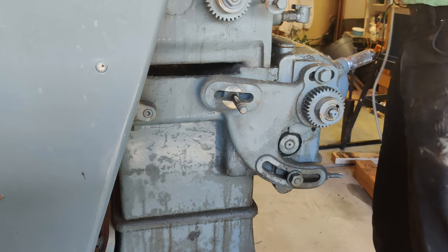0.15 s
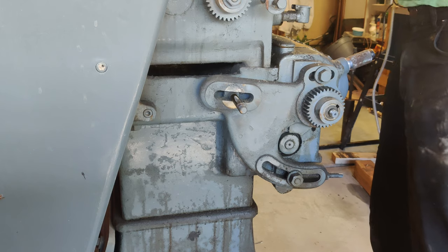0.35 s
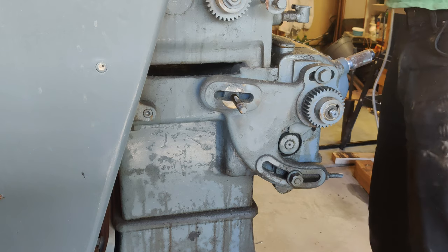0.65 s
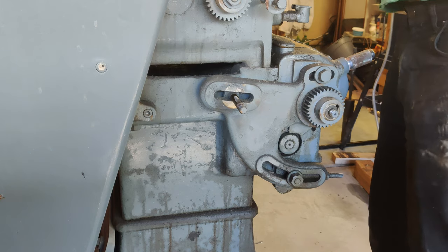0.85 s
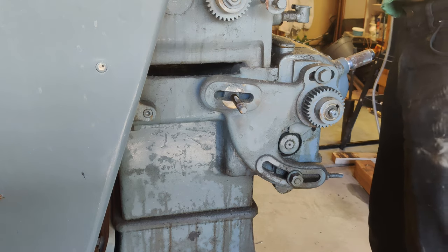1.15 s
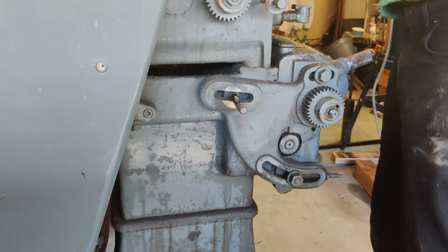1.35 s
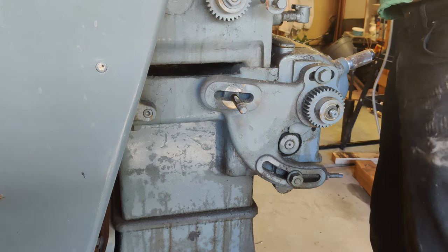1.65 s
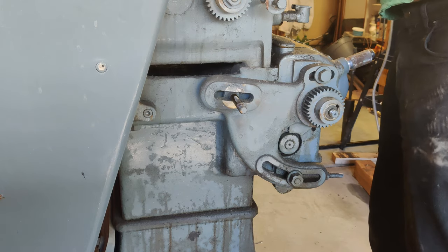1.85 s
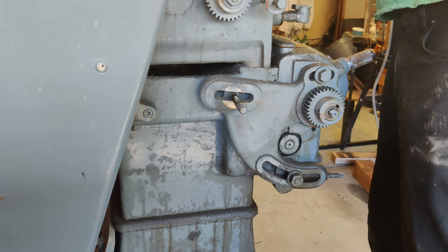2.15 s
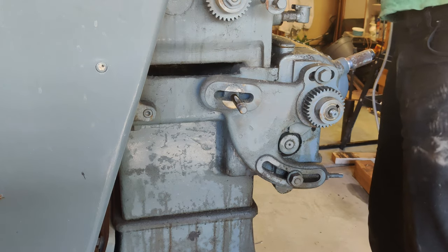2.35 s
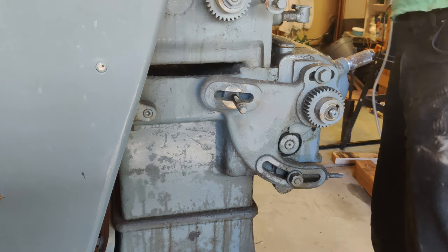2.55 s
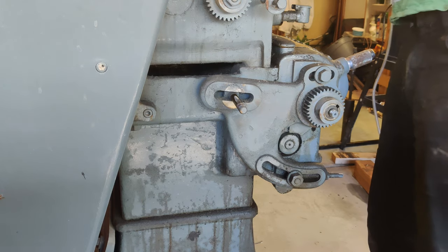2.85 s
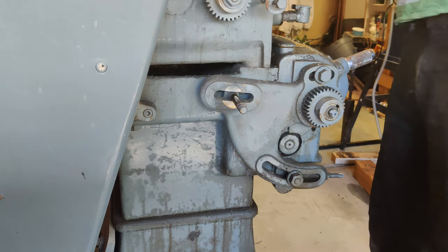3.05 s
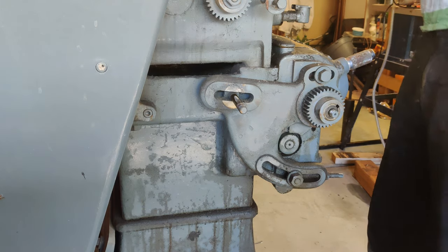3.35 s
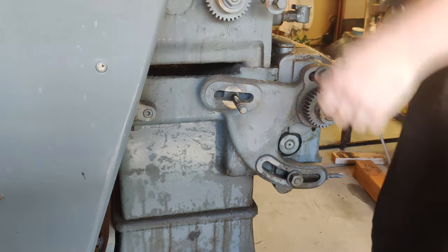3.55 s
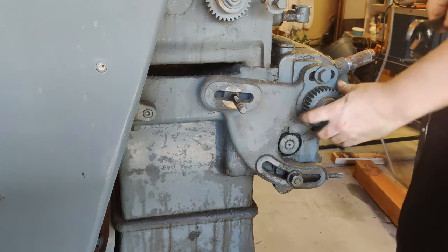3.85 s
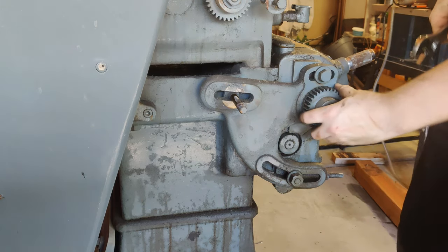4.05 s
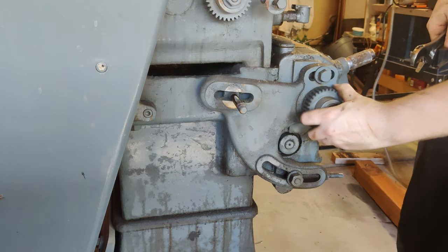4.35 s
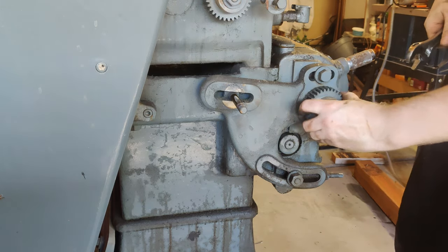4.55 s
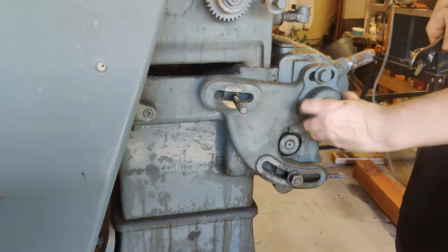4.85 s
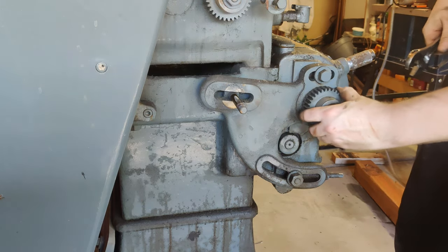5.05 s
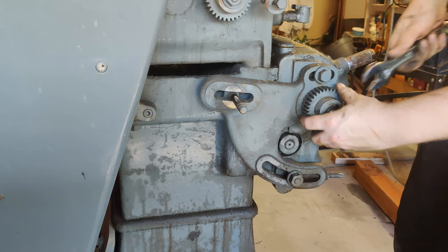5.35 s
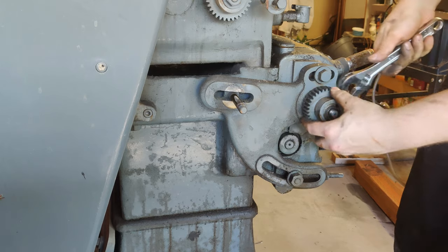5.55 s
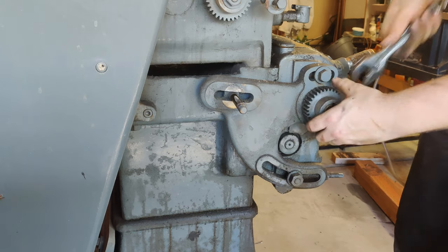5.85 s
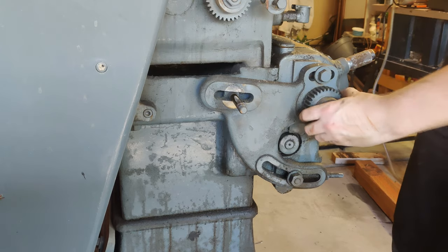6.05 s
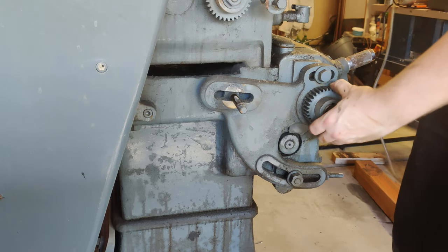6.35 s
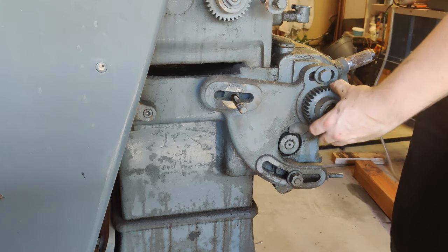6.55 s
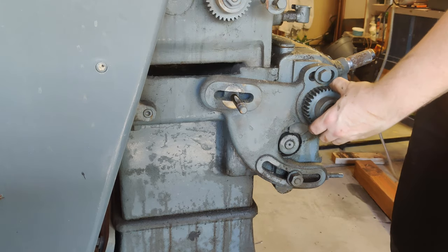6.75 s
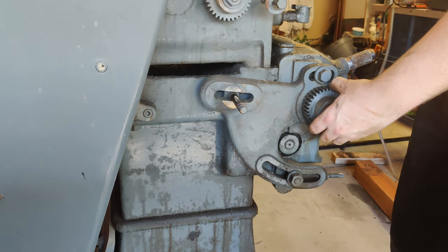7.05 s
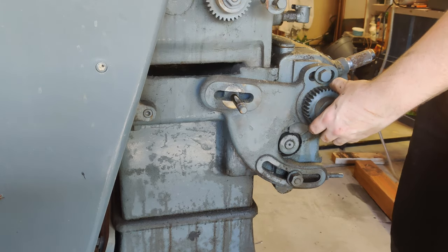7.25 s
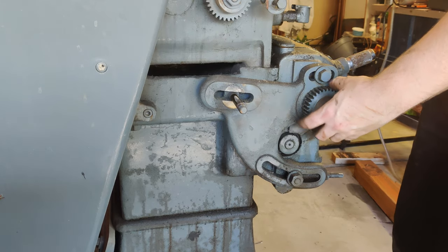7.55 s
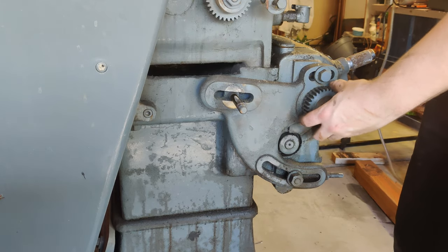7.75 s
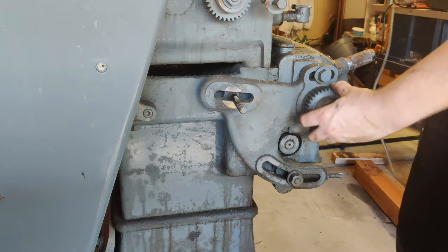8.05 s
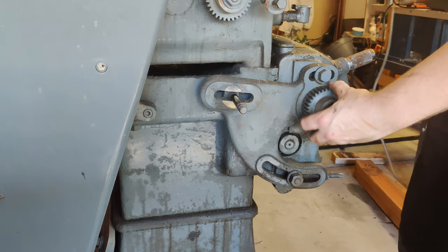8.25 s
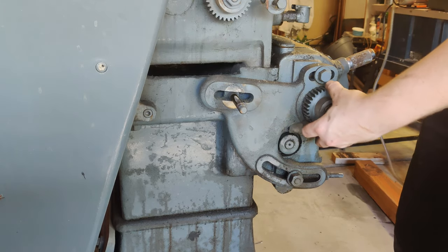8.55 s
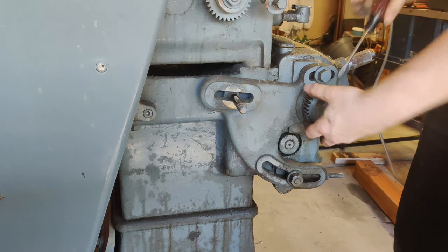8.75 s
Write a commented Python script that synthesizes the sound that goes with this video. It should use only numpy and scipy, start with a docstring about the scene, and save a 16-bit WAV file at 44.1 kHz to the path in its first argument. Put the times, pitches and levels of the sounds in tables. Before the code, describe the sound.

Over a faint low hum, metal tools tick, a gear bumps dully in the hand, a steel wrench clanks sharply and a heavy bracket clatters.

```python
"""A low machine hum and still air in a workshop come first; tools click and tap, a dull tick, a sleeve swishes.
A hand works a gear on its shaft with dull bumps; a steel wrench touches the stud, then lands with a bright clank.
The cast-iron gear bracket shifts and clatters; at the end the wrench lifts off with a bright clack. Hum is wavering
sines, air and cloth are shaped noise; each blow is a gritty contact, a crowd of short modes and a few that ring on.
A close microphone pair hears it all with the room's echoes; the recorder's gain ducks under the loudest blows."""
import sys
import numpy as np
from scipy import signal
from scipy.fft import rfft, irfft
from scipy.io import wavfile
from scipy.ndimage import uniform_filter1d, minimum_filter1d

SR = 44100
rng = np.random.default_rng(int(sys.argv[2]) if len(sys.argv) > 2 else 0)


def put_to_file(sound):
    """Save the sound as 16-bit audio at rate SR, in the file named by the first command-line argument."""
    columns = np.atleast_2d(sound).T  # one column per channel
    safe = np.clip(columns, -1, 1)
    whole_steps = np.round(safe * 32767)
    wavfile.write(sys.argv[1], SR, whole_steps.astype(np.int16))


N = 391811

# In the blow lists, level is the direct sound's energy spread over 10 ms, ahead of pan and gain control;
# bass, treble and top are relative to the middle, room is the feed to the room relative to the direct sound.
# Low lines of running machinery: [f/Hz, relative level/dB]
HUM_LINES = [(27.6, -50.5), (59.1, -44.5), (112.5, -61.5), (118.2, -68), (175, -71), (225, -64),
             (257.5, -66.5)]
# The hum swelling and sinking about its mean: [t/s, relative level/dB]
HUM_SWELL = [(0.0, -46), (0.62, -44.5), (2.07, -49), (3.19, -44.5), (4.82, -44), (6.13, -46.5), (7.07, -42),
             (8.88, -49)]
# Spectrum of the still air: [f/Hz, relative density/dB]
AIR_COLOUR = [(15, 31.5), (40, 29), (90, 14), (180, 19.5), (280, 13.5), (450, 9), (900, 2), (2000, -5),
              (4500, -12), (9000, -15), (14000, -9.5), (16000, -9)]
# Left-right likeness of diffuse sound at the microphones: [f/Hz, likeness 0 to 1]
MIC_LIKENESS = [(30, 0.69), (250, 0.89), (600, 0.42), (1500, 0.0982), (15000, 0.061)]
# Decay time of the room: [f/Hz, T60/s]
ROOM_T60 = [(150, 0.76), (400, 0.72), (1000, 0.53), (2000, 0.55), (4700, 0.47), (8000, 0.43), (15000, 0.18)]
# Colour of the room's answer, echoes included: [f/Hz, gain/dB]
ROOM_COLOUR = [(150, 4.5), (700, 2.5), (2000, 1.5), (5000, 1), (15000, -0.5)]
# First echoes from the machine's guard and the floor, before the room's colour:
# [left delay/s, right delay/s, level/dB]
EARLY_ECHOES = [(.0058, .0066, -17), (0.013, 0.016, -9), (0.0202, .0192, -17)]
# Swishes of cloth as the arm reaches out: [peak t/s, level/dB, rise/s, fall/s]
SWISHES = [(3.328, -59, .006, .07), (3.395, -58, 0.088, .12), (3.54, -57.5, 0.25, 0.23),
           (3.82, -50, 0.16, .13), (4.19, -65, .3, 0.3)]
# Spectrum of the cloth hiss: [f/Hz, relative density/dB]
SLEEVE_COLOUR = [(100, 16.5), (400, 10), (1000, 2.5), (2000, 2.5), (3800, 3.5), (7000, 0), (11000, -5.5),
                 (15000, -4)]
# A dull tick as the arm sets out, then dull bumps of the gear held in the hand: [t/s, level/dB, bass/dB]
DULL_BUMPS = [(3.324, -53, 2.5), (4.363, -48, -5), (4.508, -53.5, -9.5), (4.548, -51.5, -2),
              (4.645, -46.5, -2), (4.660, -48, 9), (4.785, -52.5, -6), (4.819, -52.5, -6),
              (4.932, -43, 5.5), (5.293, -52.5, -1.5), (5.659, -49.5, -8.5), (5.670, -45, -6.5),
              (6.175, -49, -3), (8.321, -55, -3.5), (8.368, -58.5, -2)]
# Colour of a dull bump's contact and crowd of modes: [f/Hz, relative level/dB]
BUMP_COLOUR = [(100, -7.5), (230, -4.5), (370, 2.5), (600, -2), (1100, -6), (1600, -13.5), (2500, -24),
               (5000, -30), (16000, -43.5)]
# Ringing modes of a dull bump, before the random shift: [f/Hz, relative level/dB, T60/s]
BUMP_MODES = [(318, -4.5, 0.036), (383.1, 6, 0.14), (545, -6, 0.027), (890, -8, 0.0526)]
# Light clicks of tools, and at the end the bright clack of the wrench lifting off:
# [t/s, level/dB, bass/dB, treble/dB, top/dB, room/dB]
TOOL_CLICKS = [(.5585, -55, -1, -11, -6, 3), (0.5619, -38.5, -7.5, -4.5, -12, -1),
               (.8525, -51, 5, 9, 9, 3.5), (2.609, -42.5, -14, -4, -1, -3.5),
               (2.828, -53.5, 12, -2, -12, 3), (2.833, -46, -1, -11, -2, -1),
               (2.8938, -41.5, 22, -8, -9, -11.5), (2.9, -45, 17, -2.5, 1, 0.5),
               (2.958, -34, 8, -8, -9, -10), (2.962, -40, -4, 6, 5, 2.5), (3.401, -51, -7, 15, 17, -13),
               (4.222, -55.5, 13, 12, 15, -6), (8.85, -49, 3, 22, 16, -1.5)]
# Colour of a click's contact and crowd of modes: [f/Hz, relative level/dB]
TOOL_COLOUR = [(100, -21), (500, -30.5), (950, -14), (1250, -11), (1750, -3), (2150, -9), (2700, -15.5),
               (4500, -17.5), (8000, -22.5), (12000, -30), (16000, -24)]
# Ringing modes of a click: [f/Hz, relative level/dB, T60/s]
TOOL_MODES = [(373, -18.5, 0.16), (717, -22.5, 0.22), (1135, -11, 0.077), (1250, -20, 0.049),
              (1645, -3, 0.088), (1785, -5.5, 0.056), (2070, -26, 0.11), (3350, -28, 0.21),
              (4870, -25, 0.05)]
# Two faint, hollow taps of a handled tool, then the bracket's clatter, all from one place:
# [t/s, level/dB, bass/dB, treble/dB, top/dB]
HOLLOW_KNOCKS = [(1.683, -51.5, 4, -18, -12), (1.803, -55.5, 6, -19, -10), (6.7963, -26, -11.5, -15, -16.5),
                 (6.882, -27.5, 4.5, 6.5, -5), (6.9364, -19, -9, -12.5, -1), (6.943, -21.5, -3, -8.5, 1),
                 (6.953, -23, -10, 10, 18.5), (6.9935, -17.5, 0.5, 2.5, 1), (7.008, -25.5, 7.5, 4, 10),
                 (7.087, -21.5, -5.5, 2.5, -5.5)]
# Colour of a hollow knock's contact and crowd of modes: [f/Hz, relative level/dB]
KNOCK_COLOUR = [(100, -23), (290, -22.5), (380, -11.5), (500, -12.5), (740, -1), (950, -10), (1250, 7),
                (1500, -12.5), (2600, -8), (4000, -12.5), (4750, -13), (6000, -20.5), (11000, -32),
                (16000, -30)]
# Ringing modes of a hollow knock: [f/Hz, relative level/dB, T60/s]
KNOCK_MODES = [(375.6, -4.5, 0.28), (548, -12, 0.15), (659, -14.5, 0.11), (719, -6, 0.15),
               (755.6, -7.5, 0.21), (772, -5.5, 0.092), (953, -7.5, 0.15), (1107, -2.5, 0.085),
               (1120, -11, 0.057), (1255, 7, 0.055), (1337, -12, 0.0514), (1576, -8.5, 0.11),
               (1820, -6.5, 0.13), (1887, -5.5, 0.16), (2347, -7, 0.17), (2384, -10.5, 0.26),
               (2674, -10.5, 0.17), (2803, -7.5, 0.12), (2750, -21, .1), (3352, -8, 0.16),
               (3760, -17, 0.085), (3750, -9, 0.1), (4745, -0.5, 0.07), (4900, -12.5, 0.084)]
# Wrench touching the stud, then landing and chattering: [t/s, level/dB, bass/dB, treble/dB, top/dB, room/dB]
WRENCH_HITS = [(5.6588, -39.5, -5, -1.5, -28.5, -9), (5.7074, -43, -17, 3.5, -21.5, -17),
               (6.2538, -18.5, -2.5, 16, 1, -8.5), (6.2552, -11, 4, 0, 2.5, -2),
               (6.2615, -23, -1, 2.5, 3.5, -9.5), (6.2675, -26.5, 2, 0.5, 5, -6)]
# Colour of the wrench's contact and crowd of modes: [f/Hz, relative level/dB]
WRENCH_COLOUR = [(150, -37), (700, -24), (1500, -21), (2500, -15), (3800, -19), (4520, -8.5), (4740, 6),
                 (5000, -20.5), (6300, -15.5), (8000, -23), (10700, -17), (12800, -27), (14600, -8),
                 (16000, -19.5)]
# Ringing modes of the wrench: [f/Hz, relative level/dB, T60/s]
WRENCH_MODES = [(4240, -15.5, .06), (4680, -14.5, 0.038), (4630, 4.5, 0.066), (4920, -4.5, 0.08),
                (4740, -9.5, 0.13), (6580, -8, 0.081), (8950, -36, 0.099), (9600, -12, 0.059),
                (15130, -14, .07)]


def amp(db):
    """Decibels to gain."""
    return 10 ** (np.asarray(db) / 20)


def evened(x):
    """Scales to an rms of one."""
    return x / np.sqrt(np.mean(x ** 2) + 1e-20)


def unit(x):
    """Scales each channel to an energy of one."""
    return x / np.linalg.norm(x, axis=-1, keepdims=True)


def read(points, hz):
    """Reads a spectrum on a log-frequency axis."""
    f, value = np.transpose(points)
    return np.interp(np.log(hz + 1), np.log(f + 1), value)


def follow(points):
    """Reads a curve at every sample."""
    return np.interp(np.arange(N) / SR, *np.transpose(points))


def add(mix, s, sound):
    """Mixes a stereo sound in at time s."""
    part = mix[:, round(s * SR):][:, :sound.shape[1]]
    part += sound[:, :part.shape[1]]


def colour(x, points, size=2048):
    """Causal minimum-phase filter with the given spectrum, so that attacks stay sharp."""
    hz = abs(np.fft.fftfreq(size, 1 / SR))
    log_gain = np.log(amp(read(points, hz)))
    taps = np.fft.ifft(np.exp(np.conj(signal.hilbert(log_gain)))).real
    return signal.fftconvolve(x, taps[None, :size // 2], axes=1)[:, :x.shape[1]]


def tint(sound, bands_hz, bass_db, treble_db, top_db):
    """Sets the balance of one blow at its bass, middle, treble and top frequencies."""
    return colour(sound, list(zip(bands_hz, (bass_db, 0, treble_db, top_db))))


def drift(per_s):
    """A random curve of rms one, drawn at per_s points a second and joined smoothly."""
    return evened(signal.resample(rng.standard_normal(int(per_s * N / SR) + 2), N))


def pair(length):
    """White noise at two close microphones: alike in the bass, nearly unrelated in the treble."""
    left, other = rfft(rng.standard_normal((2, length)))
    same = np.clip(read(MIC_LIKENESS, np.fft.rfftfreq(length, 1 / SR)), 0, 1)
    right = same * left + np.sqrt(1 - same ** 2) * other
    return irfft(np.array([left, right]), length)


def noise(points):
    """Diffuse stereo noise with the given spectrum and an rms of one."""
    gain = amp(read(points, np.fft.rfftfreq(N, 1 / SR)))
    return evened(irfft(rfft(pair(N)) * gain, N))


def hum(waver=0.023, phase_wander_rad=0.34, pan_db=3, level_db=-1.43, swell=0.98):
    """Low lines of running machinery, each wavering a little, all swelling together."""
    t = np.arange(N) / SR
    lines = np.zeros(N)
    for hz, db in HUM_LINES:
        strength = amp(db) * (1 + waver * drift(9.7))
        phase = 2 * np.pi * (hz * t + rng.random()) + phase_wander_rad * drift(1.9)
        lines += strength * np.sin(phase)
    level = follow(HUM_SWELL)
    swell_db = swell * (level - level.mean())
    pan = amp([[pan_db / 2], [-pan_db / 2]])
    return np.sqrt(2) * lines * amp(level_db + swell_db) * pan


def still_air(level_db=-52):
    """Steady diffuse noise of the still air."""
    return amp(level_db) * noise(AIR_COLOUR)


def room(x, build_s=0.0063, tail_db=-1, size=12):
    """A few distinct echoes, then sparse reflections that build up quickly and die away, the treble first."""
    # one reflection of random sign in every slot of `size` samples, from 5 ms on
    at = np.arange(SR // 200, SR - size, size)
    at = at + rng.integers(0, size, (2, len(at)))
    strength = rng.choice([-1., 1.], at.shape) * (1 - np.exp(-at / SR / build_s))
    taps = np.zeros((2, SR))
    np.put_along_axis(taps, at, strength, 1)
    hz, t, z = signal.stft(taps, SR, nperseg=256)
    same = np.clip(read(MIC_LIKENESS, hz), 0, 1)[:, None]
    z[1] = same * z[0] + np.sqrt(1 - same ** 2) * z[1]
    t60 = read(ROOM_T60, hz)[:, None]
    decaying = z * amp(-60 * t / t60) / np.sqrt(t60)  # the root evens the energy of long and short decays
    response = amp(tail_db) * unit(signal.istft(decaying, SR, nperseg=256)[1])
    for left_s, right_s, db in EARLY_ECHOES:
        response[[0, 1], [round(left_s * SR), round(right_s * SR)]] += amp(db)
    return signal.fftconvolve(x, colour(response, ROOM_COLOUR), axes=1)[:, :N]


def sleeve(drop_db=17.5, grain_db=0.9):
    """Cloth hiss that swells and fades with each move of the arm, roughened by fibres catching."""
    t = np.arange(N) / SR
    power = np.zeros(N)
    for s, db, rise, fall in SWISHES:
        # drop_db below the peak at one rise before it and one fall after it
        away = np.maximum((s - t) / rise, (t - s) / fall)
        power += amp(db - drop_db * away) ** 2
    return noise(SLEEVE_COLOUR) * np.sqrt(power) * amp(grain_db * drift(200))


def blow(modes, crack, crack_t60, scatter_db, ring_db, contact_s, spread_hz=4000):
    """One blow: a gritty contact, a crowd of short-lived modes, and a few that ring on."""
    t = np.arange(SR // 2) / SR
    contact = rng.standard_normal(len(t)) * t * np.exp(-t / contact_s)
    swell = 1 - np.exp(-t / contact_s)  # the vibration takes a moment to fill the part
    crowd = pair(len(t)) * swell * amp(-60 * t / crack_t60)
    grit = unit(colour(contact[None], crack))
    attack = unit(grit + amp(scatter_db) * unit(colour(crowd, crack)))
    ring = np.zeros((2, len(t)))
    for hz, db, t60 in modes:
        # the higher a mode, the more its phase differs between the microphones
        phase = rng.uniform(0, 2 * np.pi) + hz / spread_hz * rng.standard_normal((2, 1))
        ring += amp(db - 60 * t / t60) * np.sin(2 * np.pi * hz * t + phase)
    return attack + amp(ring_db) * unit(ring * swell)


def strikes(hits, pan_db, left_lag_ms):
    """Plays a set of blows (s, level dB, room dB, sound) from one place: direct sound and room feed."""
    direct, feed = np.zeros((2, 2, N))
    span = np.sqrt(SR / 100)  # level = energy spread over 10 ms
    pan = amp([[pan_db / 2], [-pan_db / 2]])
    for s, db, room_db, sound in hits:
        sound = span * amp(db) * unit(sound)
        add(direct, s, sound * pan)
        add(feed, s, sound * amp(room_db))
    # a positive lag reaches the left microphone later
    khz = np.fft.rfftfreq(N, 1000 / SR)
    direct[0] = irfft(rfft(direct[0]) * np.exp(-2j * np.pi * khz * left_lag_ms), N)
    return np.array([direct, feed])


def click():
    """Hard metal lightly struck: a short, pitched clack."""
    return blow(TOOL_MODES, TOOL_COLOUR, crack_t60=0.087, scatter_db=1, ring_db=-9, contact_s=0.00036)


def tool_clicks(bands_hz=(1020, 1650, 3620, 9300)):
    """Light clicks of tools, and at the end the bright clack of the wrench lifting off."""
    hits = []
    for s, db, bass_db, treble_db, top_db, room_db in TOOL_CLICKS:
        hits.append((s, db, room_db, tint(click(), bands_hz, bass_db, treble_db, top_db)))
    return strikes(hits, pan_db=-0.7, left_lag_ms=-0.058)


def bump(shift_spread=.09):
    """A soft contact with a smothered ring, whose pitch shifts at random from bump to bump."""
    shift = np.exp(shift_spread * rng.uniform(-1, 1))
    modes = [(hz * shift, db, t60) for hz, db, t60 in BUMP_MODES]
    return blow(modes, BUMP_COLOUR, crack_t60=0.08, scatter_db=-1.5, ring_db=-3, contact_s=0.0017)


def grip_fidgets(start_s=7.6, end_s=8.6, per_s=7, level_db=-65.5, scatter_db=3):
    """While the fingers settle on the gear it rocks faintly, at random times and strengths."""
    count = round(per_s * (end_s - start_s))
    fidgets = []
    for when, force in rng.random((count, 2)):
        s = start_s + when * (end_s - start_s)
        fidgets.append((s, level_db + scatter_db * (2 * force - 1), 0))
    return fidgets


def dull_bumps(bands_hz=(376, 900, 1990, 3000), treble_db=-2.5, top_db=-4, room_db=2.5):
    """A dull tick as the arm sets out, then dull bumps of the gear held in the hand, some very faint."""
    hits = []
    for s, db, bass_db in list(DULL_BUMPS) + grip_fidgets():
        hits.append((s, db, room_db, tint(bump(), bands_hz, bass_db, treble_db, top_db)))
    return strikes(hits, pan_db=0.2, left_lag_ms=-0.027)


def knock():
    """A hollow knock: many modes, with a low one among them."""
    return blow(KNOCK_MODES, KNOCK_COLOUR, crack_t60=0.062, scatter_db=0.0, ring_db=-1.0, contact_s=0.0013)


def hollow_knocks(bands_hz=(384, 1300, 4200, 8000), room_db=-1.5):
    """Two faint, hollow taps of a handled tool, then the bracket's clatter, all from one place."""
    hits = []
    for s, db, bass_db, treble_db, top_db in HOLLOW_KNOCKS:
        hits.append((s, db, room_db, tint(knock(), bands_hz, bass_db, treble_db, top_db)))
    return strikes(hits, pan_db=-0.5, left_lag_ms=-0.085)


def wrench():
    """Steel on steel: a bright crack with one cluster of high modes."""
    return blow(WRENCH_MODES, WRENCH_COLOUR, crack_t60=0.047, scatter_db=0, ring_db=-12, contact_s=0.00029)


def wrench_hits(bands_hz=(1500, 4070, 5750, 9900)):
    """Two light, dry touches, then the clank and its rebounds."""
    hits = []
    for s, db, bass_db, treble_db, top_db, room_db in WRENCH_HITS:
        hits.append((s, db, room_db, tint(wrench(), bands_hz, bass_db, treble_db, top_db)))
    return strikes(hits, pan_db=4.5, left_lag_ms=0.064)


def scene():
    """Metal parts in one room, over hum and still air."""
    background = hum() + still_air()
    direct, feed = tool_clicks() + hollow_knocks() + wrench_hits() + dull_bumps()
    return direct + room(feed) + sleeve() + background


def record(dry, threshold_db=-17, squeeze=0.47, hold_s=0.072, recover_db_per_s=130, ceiling=.85, edge_hz=15900):
    """Gain control ducks under loud blows, holds briefly and recovers; peaks round off; then the band limit."""
    power = abs(uniform_filter1d((dry ** 2).mean(0), size=128))
    power_db = 10 * np.log10(power + 1e-12)
    wanted_db = squeeze * np.maximum(power_db - threshold_db, 0)
    # hold the deepest duck of the last hold_s
    reach = int(hold_s * SR / 2)
    held_db = -minimum_filter1d(-wanted_db, 2 * reach + 1, origin=reach)
    # then recover at a steady rate
    fall = np.arange(N) * recover_db_per_s / SR
    duck_db = uniform_filter1d(np.maximum.accumulate(held_db + fall) - fall, size=64)
    rounded = ceiling * np.tanh(dry * amp(-duck_db) / ceiling)
    edge = signal.firwin(511, edge_hz, window=("kaiser", 9), fs=SR)
    return signal.oaconvolve(rounded, edge[None], "same")


dry = scene()
out = record(dry)
put_to_file(out)
```